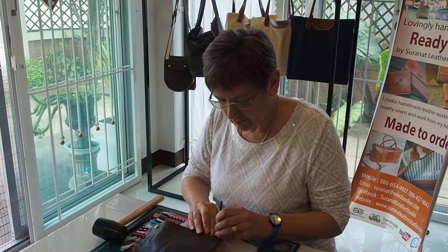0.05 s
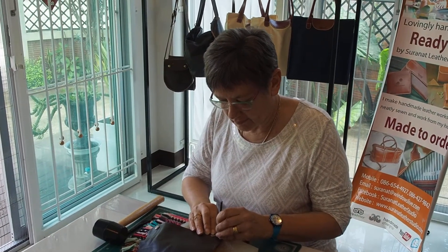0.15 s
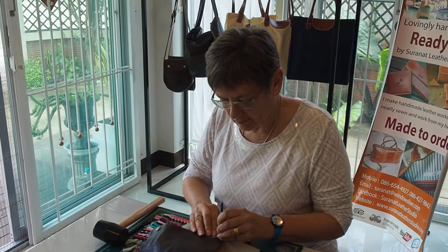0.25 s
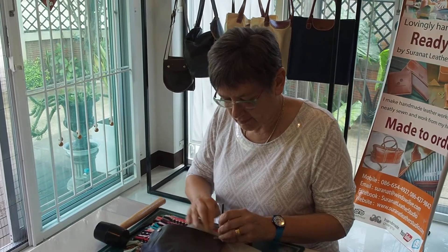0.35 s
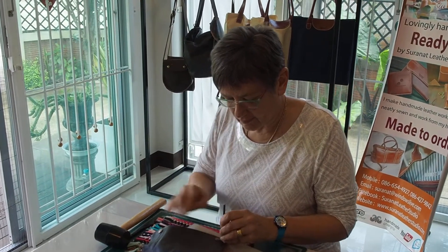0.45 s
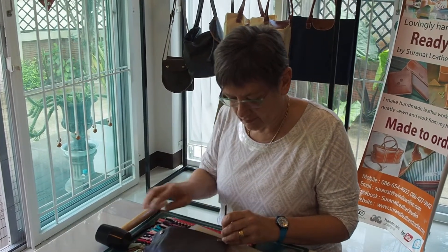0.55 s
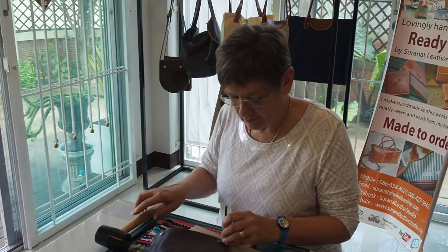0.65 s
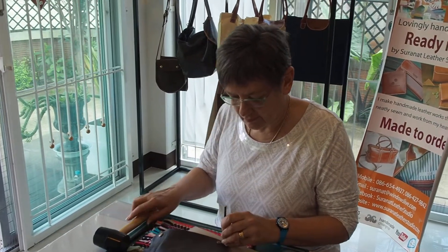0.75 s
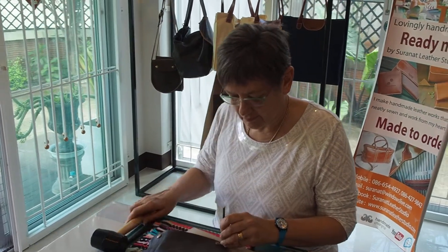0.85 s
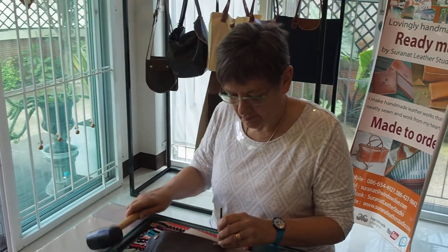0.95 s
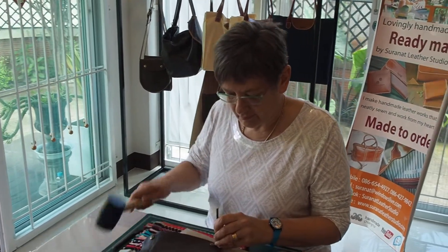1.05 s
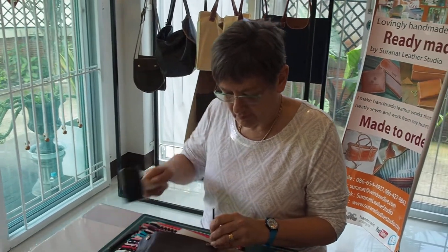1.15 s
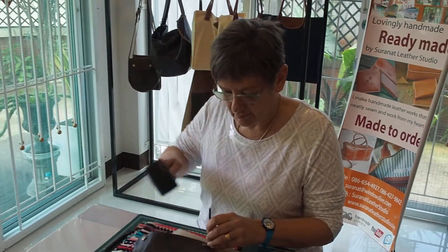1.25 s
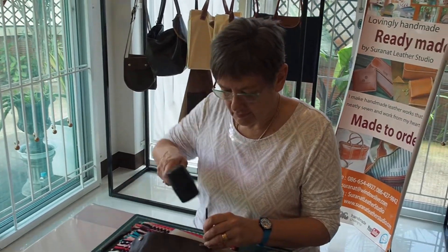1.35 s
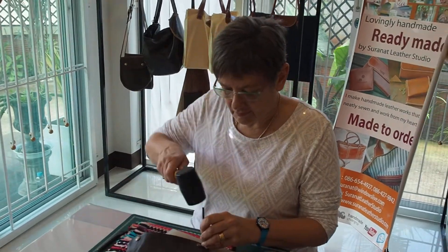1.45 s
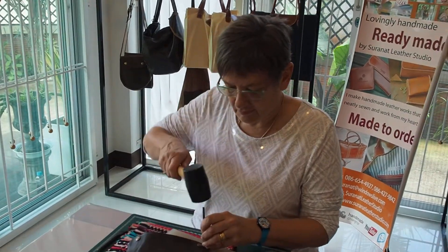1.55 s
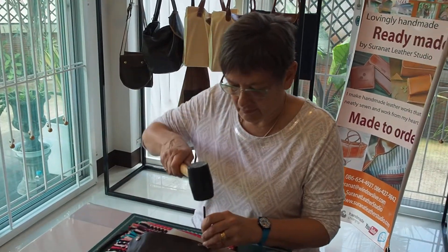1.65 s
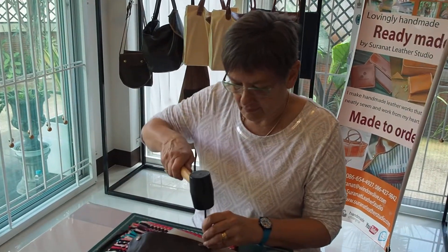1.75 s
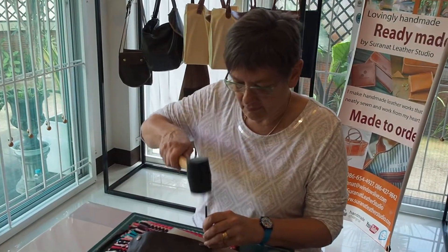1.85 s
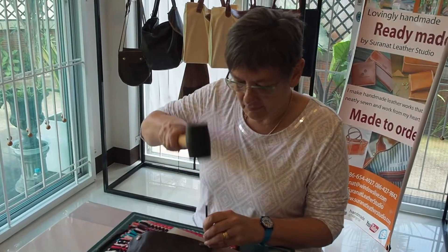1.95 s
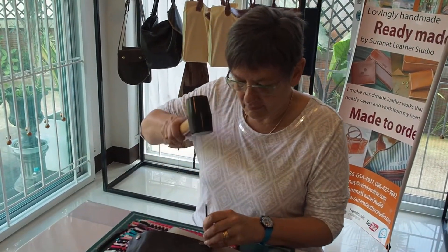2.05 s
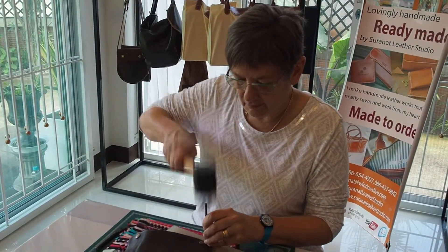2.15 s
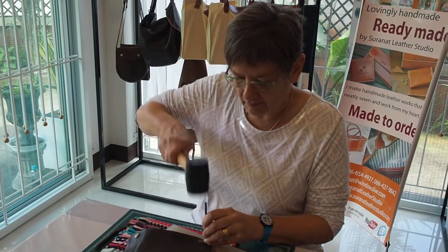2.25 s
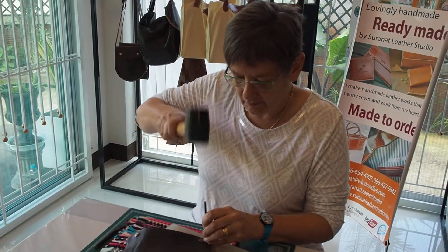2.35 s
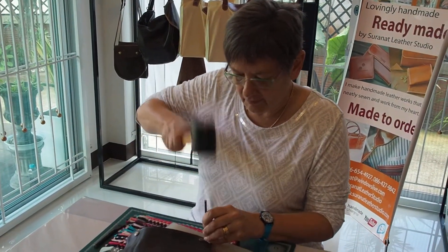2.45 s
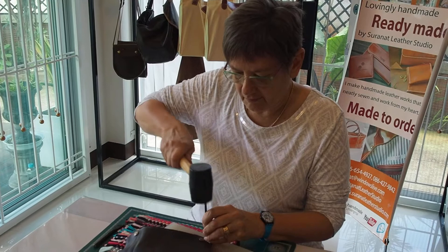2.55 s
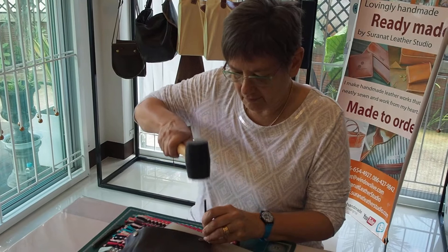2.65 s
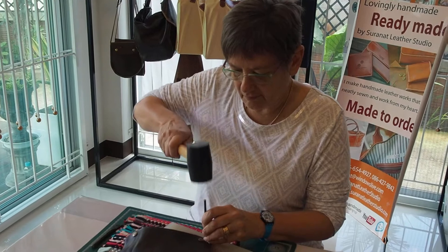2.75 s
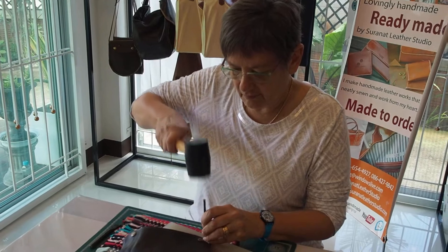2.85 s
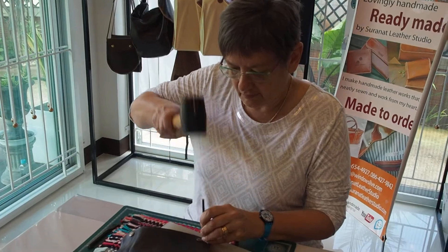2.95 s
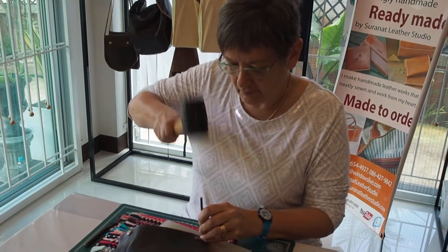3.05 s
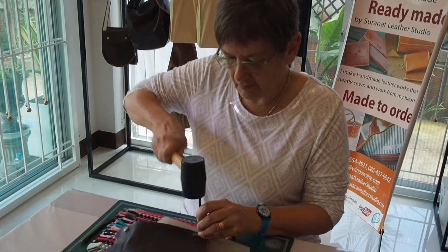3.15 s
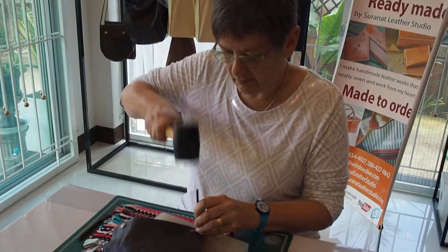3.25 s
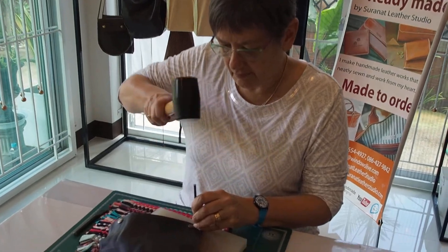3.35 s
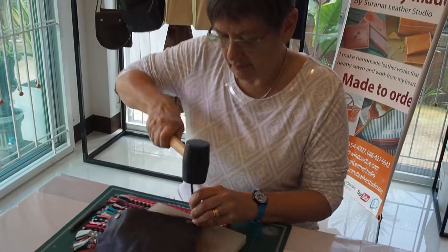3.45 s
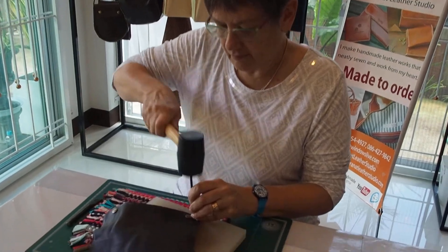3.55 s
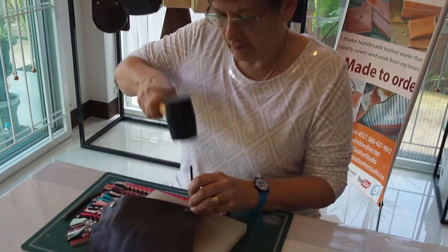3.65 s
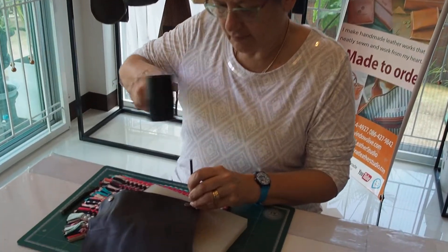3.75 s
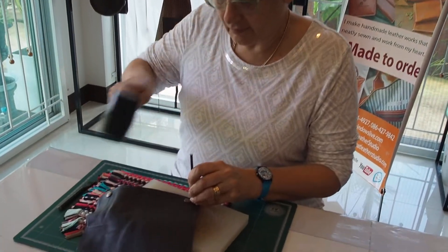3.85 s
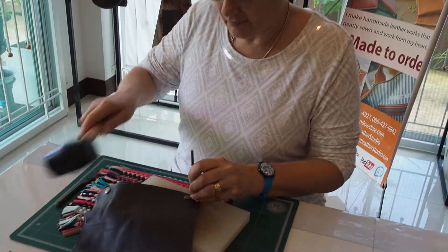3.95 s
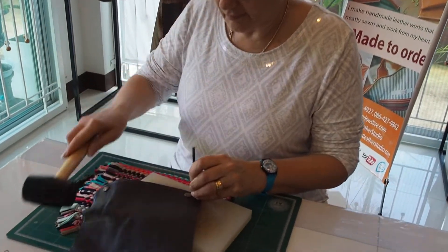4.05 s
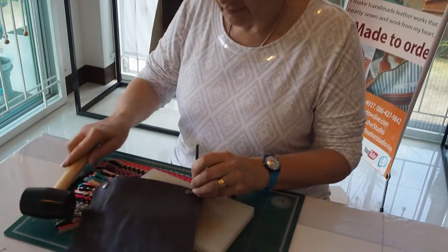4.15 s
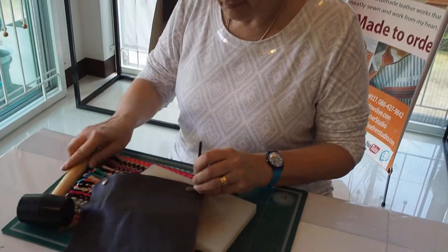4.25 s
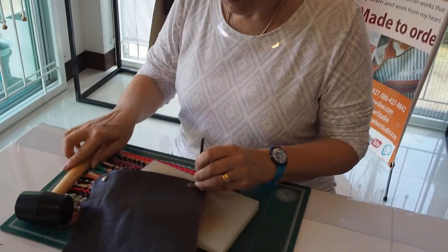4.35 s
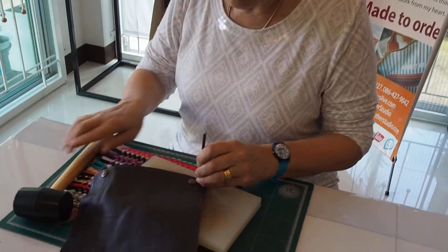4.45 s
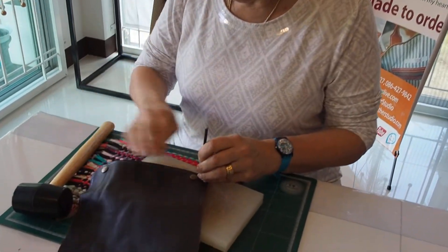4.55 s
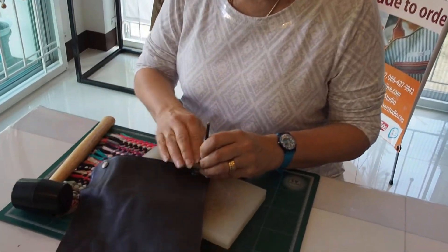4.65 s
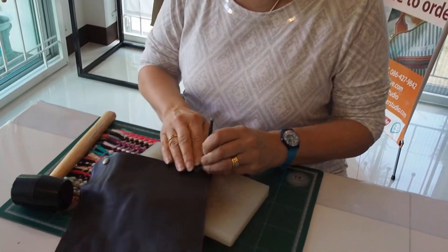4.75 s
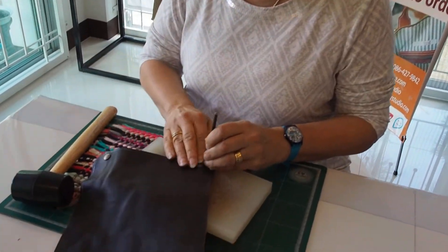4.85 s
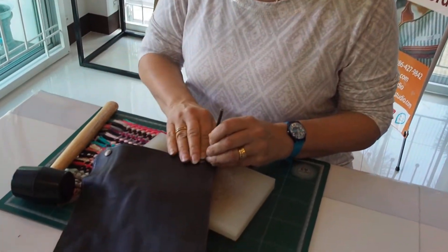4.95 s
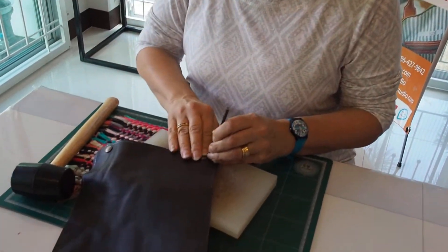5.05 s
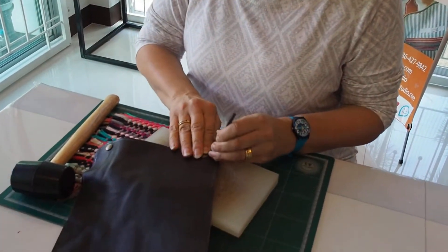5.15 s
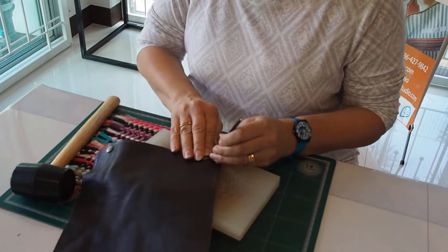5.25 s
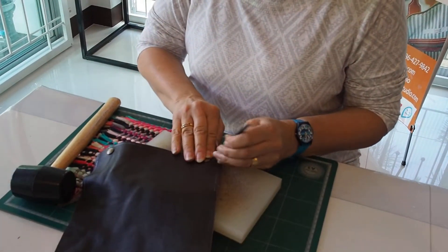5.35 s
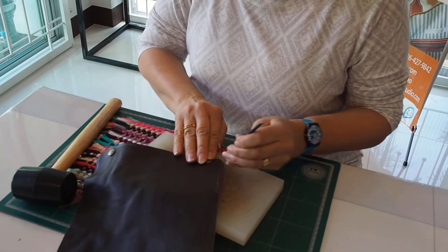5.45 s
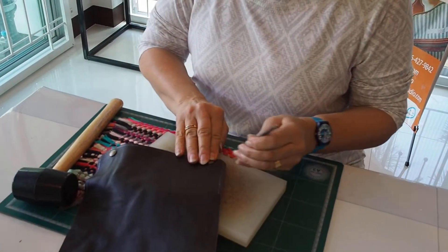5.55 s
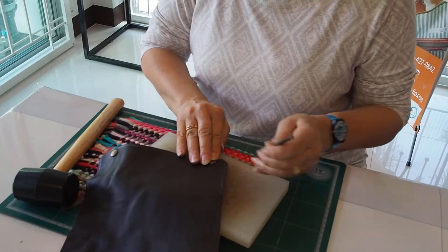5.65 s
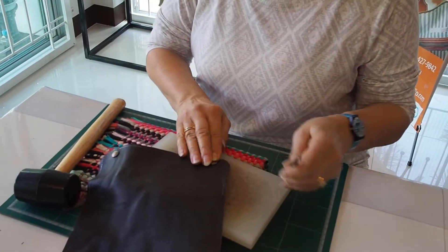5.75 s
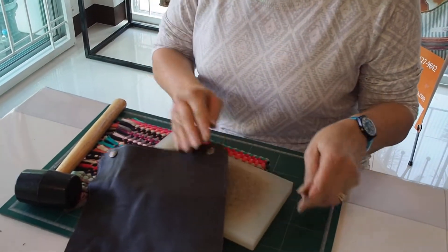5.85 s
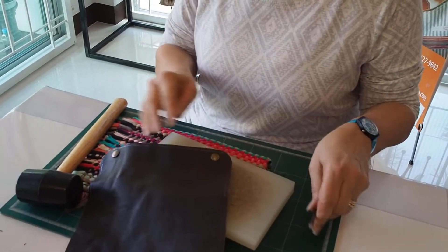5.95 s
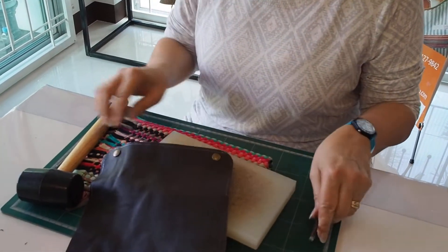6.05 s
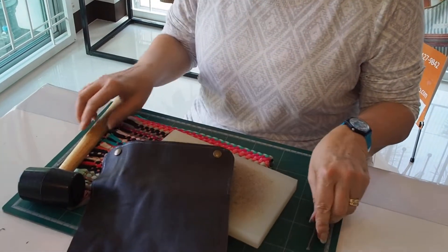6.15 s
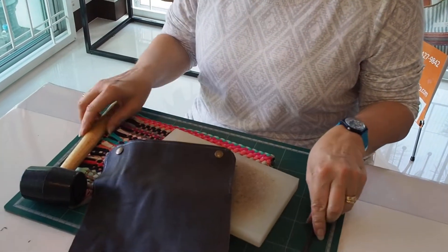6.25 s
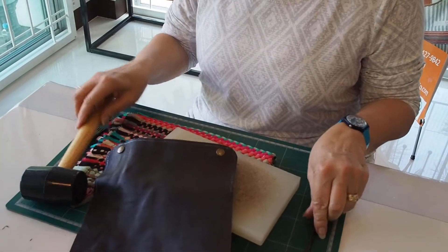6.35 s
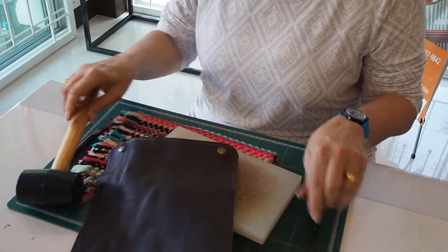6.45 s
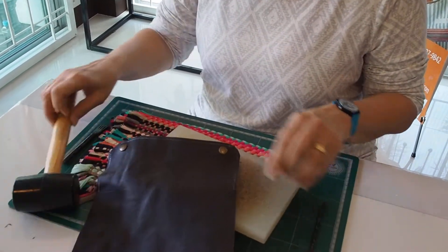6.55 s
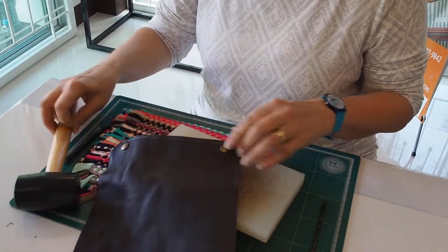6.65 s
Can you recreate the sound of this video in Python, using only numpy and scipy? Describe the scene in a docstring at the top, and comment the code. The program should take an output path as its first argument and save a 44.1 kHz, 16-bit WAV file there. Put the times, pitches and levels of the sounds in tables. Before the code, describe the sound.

Close, slightly overloaded microphone in a bright tiled workshop. A faint squeak and small thud as a mallet is lifted, one light tap, then four loud cracking blows of steel through leather into a board, the table booming under each. The mallet lands with a dull thud and wooden clack, followed by brushes, soft pats and handle knocks over a faint outdoor wash.

```python
"""A tiled workshop: a mallet drives a steel punch through leather into a cutting board on a table.
The mallet is picked up, taps once, strikes four times and is laid down; small handling sounds follow.
Struck bodies are sums of dying modes in a diffuse room; brushes, wash and rumble are shaped noise.
Outside, a vehicle passes and a motor hums. Loud blows overload the near microphone and its limiter ducks."""
import sys
import numpy as np
from scipy import signal
from scipy.fft import rfft, irfft, next_fast_len
from scipy.io import wavfile

SR = 44100
rng = np.random.default_rng(int(sys.argv[2]) if len(sys.argv) > 2 else 0)


def store_pcm(level_fs):
    """Save levels as 16-bit WAV."""
    pcm = np.round(np.clip(level_fs, -1, 1) * 32767).astype(np.int16)
    wavfile.write(sys.argv[1], SR, np.atleast_2d(pcm).T)


N = 295351
TIME = np.arange(N) / SR  # s, the whole scene
RING = np.arange(SR) / SR  # s, one struck sound

# modes of the table: f/Hz, level/dB, t60/s
TABLE_MODES = [(70.8, -28, 1.12), (110.3, -20, 0.42), (120.2, -10.5, 0.1), (132, -10.5, 0.58),
               (155.7, -28, 0.93), (182.5, -27, 0.85), (218, -24, 0.13), (308, -19.5, 0.19),
               (357.6, -15, 0.1), (509, -18, 0.087)]
# modes of the mallet head: f/Hz, level/dB, t60/s
HEAD_MODES = [(159, -10, 0.05), (337, -17.5, 0.14), (440, -4.5, 0.029), (540, 1.5, 0.0067), (825, 0, 0.029),
              (1017, 4, 0.0045)]


def amp(db):
    """Decibels to gain."""
    return 10 ** (np.asarray(db) / 20)


def unit(x):
    """Scales to rms 1."""
    return x / np.sqrt(np.mean(x ** 2) + 1e-20)


def read(points, hz):
    """Reads a curve on a log-frequency axis."""
    f, value = np.transpose(points)
    return np.interp(np.log(hz + 1), np.log(f + 1), value)


def add(mix, s, sound):
    """Mixes a two-channel sound in at time s."""
    part = mix[:, round(s * SR):][:, :sound.shape[1]]
    part += sound[:, :part.shape[1]]


def lowpass(x, hz, order=1):
    """Gentle causal low-pass."""
    return signal.sosfilt(signal.butter(order, min(hz, 0.45 * SR), fs=SR, output="sos"), x)


def pair(size, colour, lag=0):
    """Coloured diffuse noise at two close ports: nearly the same through most of the bass, unrelated in the treble."""
    # f/Hz, left-right likeness (1 = the same; 0 and below are used as unrelated)
    likeness = [(30, 0.082), (60, 0.82), (130, 0.97), (290, 0.93), (640, 0.95), (1410, 0.8), (3100, 0.14),
                (6820, -0.39), (15000, -0.75)]
    length = next_fast_len(size, real=True)
    hz = np.fft.rfftfreq(length, 1 / SR)
    mid, side = rfft(rng.standard_normal((2, length)))
    same = np.clip(read(likeness, hz), 0, 1)
    mid = mid * np.sqrt((1 + same) / 2)
    side = side * np.sqrt((1 - same) / 2)
    right = (mid - side) * np.exp(-2j * np.pi * hz * lag)  # lag in s
    ports = np.array([mid + side, right])
    return irfft(ports * amp(read(colour, hz)), length)[:, :size]


def ring(modes, contact_hz, late=0):
    """A struck body: dying modes of alternating sign; a softer contact excites less treble."""
    t = np.maximum(RING - late, 0)
    swing = np.zeros(len(RING))
    for k, (hz, db, t60) in enumerate(modes):
        swing += (-1) ** k * amp(db - 60 * t / t60) * np.cos(2 * np.pi * hz * t)
    return lowpass(swing * (RING >= late), contact_hz, order=2)


def push(hz):
    """A soft shove of the table top: about one swing, no ring."""
    cycles = RING * hz
    envelope = (cycles / 0.89) ** 2 * np.exp(2 - 2 * cycles / 0.66)
    return envelope * np.sin(2 * np.pi * cycles)


def scuff(length, low_hz, high_hz, snap, order=4):
    """A gritty burst from surfaces that slip as they meet; snap is the energy share of the first click."""
    grit = rng.standard_normal(len(RING)) * np.exp(-RING / length)
    share = np.clip(snap, 0, 1)
    energy = length * SR / 2
    burst = np.sqrt(1 - share) * grit + np.sqrt(share * energy) * (RING == 0)
    burst = lowpass(burst - lowpass(burst, low_hz), high_hz, order=order)
    return burst * np.sqrt(energy / np.sum(burst ** 2))


def in_room(sound, wet_db, build=0.0049):
    """Direct sound, first echoes and a diffuse tail that swells and dies faster in the treble."""
    # reverberation: f/Hz, t60/s
    room_t60 = [(100, 0.99), (300, 0.64), (800, 0.54), (2000, 0.52), (5000, 0.49), (14000, 0.4)]
    # colour of the tail against the direct sound: f/Hz, level/dB
    room_colour = [(100, -11.5), (300, 3.5), (750, 2.5), (1500, 3.5), (3600, 4), (6500, -4), (14000, 0)]
    # echoes off table, body and floor: t/s, level/dB
    echoes = [(.0056, -13), (.0098, -47), (0.0102, -15)]
    # port balance for direct sound from the table: f/Hz, left minus right/dB
    port_balance = [(1000, -0.5), (2000, 0), (4000, 8.5), (8000, 14.5), (12000, -29)]
    hz, t, z = signal.stft(pair(len(RING), room_colour), SR, nperseg=256)
    t60 = read(room_t60, hz)[:, None]
    z = z * amp(-60 * t / t60)
    z = z * np.sqrt(2 * np.log(1000) / (t60 * SR))  # equal energy whatever the decay time
    tail = signal.istft(z, SR)[1][:, :len(RING)]
    response = amp(wet_db) * tail * (1 - np.exp(-(RING / build) ** 2))
    for s, db in echoes:
        response[:, round(s * SR)] += amp(db)
    tilt_db = read(port_balance, np.fft.rfftfreq(2 * len(RING), 1 / SR)) / 2
    direct = irfft(rfft(sound, 2 * len(RING)) * amp([tilt_db, -tilt_db]))
    reflected = signal.fftconvolve(sound[None], response, axes=1)
    return direct[:, :len(RING)] + reflected[:, :len(RING)]


def background(swell_db=0.38):
    """Outdoor wash that swells very slightly, reaching the right port first, and the microphone's hiss."""
    # outdoor wash: f/Hz, relative level per Hz/dB
    wash_colour = [(25, -19), (58, -12), (92, -3), (175, -2), (250, -12), (340, -7.5), (620, -6.5),
                   (1050, -3.5), (1600, -9), (2600, -18.5), (4000, -21), (6300, -27.5), (10000, -31),
                   (16000, -42)]
    # microphone hiss: f/Hz, relative level per Hz/dB
    hiss_colour = [(2000, -30), (6000, -7), (7600, 8), (9000, -23), (12300, -2), (13300, 5.5), (16000, 4.5)]
    wash_db, hiss_db, wash_lag_s = -35, -51, -0.000064
    swell = unit(lowpass(rng.standard_normal(N), 5.9, order=2))
    wash = amp(wash_db + swell_db * swell) * unit(pair(N, wash_colour, wash_lag_s))
    return wash + amp(hiss_db) * unit(pair(N, hiss_colour))


def motor():
    """One hum of steady pitch that swells when the motor takes up load."""
    hum_hz, idle_db, load_db = 300, -51.5, -36.5
    load_at_s, rise_s = 3.68, 0.24
    load = 1 - np.exp(-np.maximum(TIME - load_at_s, 0) / rise_s)
    level = amp(idle_db) * (1 - load) + amp(load_db) * load
    return level * unit(np.sin(2 * np.pi * hum_hz * TIME))


def vehicle(waver=0.022):
    """A wavering engine note, lowered by Doppler shift as it passes, and a low roar emerge past buildings."""
    # road roar: f/Hz, relative level per Hz/dB
    roar_colour = [(40, -42), (65, -38), (85, 4.5), (115, -3.5), (145, 2.5), (200, -17), (260, -52),
                   (500, -45)]
    pass_at_s, speed_m_per_s, distance_m, sound_m_per_s = 5.55, 24, 22.3, 343
    # level at the closest point, and its change per doubling of distance
    engine_hz, engine_db, engine_fall_db = 81.6, -45.5, -0.5
    roar_db, roar_fall_db = -41.5, 0.5
    # when and how fast it clears the buildings that screen it; their loss
    clear_at_s, clear_s, screen_db = 2.7, 0.2, -14.5
    along = speed_m_per_s * (TIME - pass_at_s)
    metres = np.hypot(along, distance_m)
    doublings = np.log2(metres / distance_m)
    hz = engine_hz / (1 + speed_m_per_s / sound_m_per_s * along / metres)
    drift = unit(lowpass(rng.standard_normal(N), 6.0, order=2))
    turns = np.cumsum(hz * (1 + waver * drift)) / SR
    engine = amp(engine_db + engine_fall_db * doublings) * unit(np.sin(2 * np.pi * turns))
    roar = amp(roar_db + roar_fall_db * doublings) * unit(pair(N, roar_colour))
    screened = (1 - np.tanh((TIME - clear_at_s) / clear_s)) / 2
    return amp(screen_db * screened) * (engine + roar)


def handheld_rumble():
    """Faint low noise of the hand-held microphone, with a soft swell at each nudge."""
    # nudges: t/s, level/dB, half length/s
    nudges = [(5.8, -41, 0.066), (6.08, -37, 0.08), (6.329, -30.5, 0.12)]
    # rumble: f/Hz, relative level per Hz/dB
    rumble_colour = [(12, -8), (30, 16), (55, 4), (130, 9), (400, -39)]
    level = amp(-55)  # while held still
    for s, db, half in nudges:
        level = level + amp(db) * np.exp(-((TIME - s) / half) ** 2)
    return level * unit(pair(N, rumble_colour))


def squeak(jitter=0.058):
    """A brief unsteady high note: harmonics swell and fade in one arch and linger in the room."""
    # partials: multiple of the base pitch, level/dB
    partials = [(2, 1), (3, -8.5), (4, -12)]
    at_s, length_s, base_hz, level_db = 0.686, 0.043, 2390, -39.5
    out = np.zeros((2, N))
    arch = np.sqrt(np.maximum(np.sin(np.pi * np.minimum(RING / length_s, 1)), 0))
    wobble = unit(lowpass(rng.standard_normal(len(RING)), 440))
    turns = np.cumsum(base_hz * (1 + jitter * wobble)) / SR
    note = sum(amp(db) * np.sin(2 * np.pi * k * turns) for k, db in partials)
    add(out, at_s, in_room(amp(level_db) * arch * note, wet_db=1))
    return out


def brushing():
    """Fingers and punch brush the leather: decaying bursts of grainy noise, higher when longer."""
    # brushes: t/s, level/dB, decay length/s
    brushes = [(0.348, -53, 0.039), (0.825, -53, 0.023), (5.349, -45, 0.006), (5.373, -38, 0.0036),
               (5.835, -29.5, 0.0014), (6.631, -43, .0056)]
    centre_hz, rise = 8000, 0.26  # centre of a 10 ms brush; octaves per doubling of length
    out = np.zeros((2, N))
    for s, db, length in brushes:
        hz = centre_hz * (length / 0.01) ** rise
        grains = rng.standard_normal(len(RING)) * rng.exponential(1, len(RING))
        fizz = lowpass(grains - lowpass(grains, hz), hz, order=2)
        add(out, s, in_room(amp(db) * unit(fizz) * np.exp(-RING / length), wet_db=3.0))
    return out


def pats():
    """The free hand comes down softly on the table, shoving it without a ring."""
    # pats: t/s, level/dB, f/Hz
    hand_pats = [(6.0568, -13, 97.5), (6.185, -19, 110)]
    out = np.zeros((2, N))
    for s, db, hz in hand_pats:
        add(out, s, in_room(amp(db) * push(hz), wet_db=-2))
    return out


def mallet_handling():
    """The heavy head thuds on the mat; the light handle clacks and scuffs as it lands, and metal clinks."""
    # head bumping on the mat: t/s, head level/dB, table level/dB, contact hardness f/Hz
    bumps = [(0.952, -3, -18.5, 2270), (4.2870, 3, -4.5, 600)]
    # wooden handle on the table: t/s, wood level/dB, scuff level/dB, scuff brightness f/Hz
    clacks = [(4.3850, -7.5, -10, 5140), (4.3915, -23, -19, 6900), (6.2610, -2.5, -12.5, 4930),
              (6.3541, -20, -24.5, 5440), (6.391, -16.5, -25, 4500)]
    # something small and metal clinks as the handle settles: t/s, level/dB
    clinks = [(4.389, -26)]
    # modes of the handle: f/Hz, level/dB, t60/s
    handle_modes = [(386, -15, 0.016), (750, -11.5, 0.026), (935, -7.5, 0.013), (1580, -2, 0.0034),
                    (2470, -37, 0.0022), (3700, -4.5, 0.0028)]
    # modes of the small metal: f/Hz, level/dB, t60/s
    metal_modes = [(1450, 5, 0.031), (4640, 1, .014), (7500, -8, 0.017)]
    click_db = -18.5  # the click of first contact, against the head's thud
    out = np.zeros((2, N))
    for s, head_db, table_db, hard_hz in bumps:
        thud = amp(head_db) * ring(HEAD_MODES, hard_hz)
        thud += amp(table_db) * ring(TABLE_MODES, contact_hz=460, late=0.0011)
        click = amp(head_db + click_db) * scuff(length=0.00086, low_hz=4500, high_hz=6500, snap=0.95)
        add(out, s, in_room(thud, wet_db=-1.5) + in_room(click, wet_db=1.5))
    for s, wood_db, scuff_db, bright_hz in clacks:
        wood = amp(wood_db) * ring(handle_modes, contact_hz=6150)
        slip = amp(scuff_db) * scuff(length=0.00098, low_hz=1700, high_hz=bright_hz, snap=0.55, order=3)
        add(out, s, in_room(wood + slip, wet_db=2))
    for s, db in clinks:
        add(out, s, in_room(amp(db) * ring(metal_modes, contact_hz=12000), wet_db=0.5))
    return out


def punching(table_softness=0.25):
    """The steel cracks and shears the leather; a moment later it bottoms in the board and the table booms."""
    # mallet on the punch: t/s, force level/dB, contact hardness f/Hz
    blows = [(1.7667, -9.5, 1700), (2.2021, 10, 3400), (2.5322, 19.5, 2470), (3.152, 20.5, 2150),
             (3.4816, 19.5, 2260)]
    # modes of the cutting board: f/Hz, level/dB, t60/s
    board_modes = [(365, -12, 0.017), (553, -21.5, 0.024), (751, -1.5, 0.015), (881, 2, 0.0051),
                   (1074, -8.5, 0.018), (1490, -8, 0.0033), (1915, -6, 0.0027)]
    # modes of the steel punch: f/Hz, level/dB, t60/s
    punch_modes = [(2720, -22, 0.0045), (3540, -2.5, 0.0049), (4640, 3.5, 0.001), (6180, -2, 0.0025)]
    # levels at force 0 dB, and growth in dB per dB of force
    boom_db, boom_growth = 0.5, 0.61
    crack_db, crack_growth = -10, 1.015
    thump_db, thump_growth, thump_hz = -8, 0.25, 82
    # top edges of crack and shear as multiples of the hardness; shear level against the crack
    crack_bright, shear_bright, shear_db = 2.9, 3.1, -32.5
    recoil_db, recoil_hz = -1, 377  # the head's own dull ring, against the thump; its top edge
    out = np.zeros((2, N))
    for s, force_db, hard_hz in blows:
        steel_db = crack_db + crack_growth * force_db
        crack = amp(steel_db) * ring(punch_modes, crack_bright * hard_hz)
        add(out, s, in_room(crack, wet_db=-5))
        # the parting leather hisses briefly, mostly heard by way of the room
        hiss = scuff(length=0.0016, low_hz=1500, high_hz=shear_bright * hard_hz, snap=0.85, order=2)
        add(out, s, in_room(amp(steel_db + shear_db) * hiss, wet_db=20))
        knock = amp(force_db) * ring(board_modes, hard_hz, late=0.0003)
        add(out, s, in_room(knock, wet_db=1.0))
        # board and mat cushion the blow on its way to the table
        boom = ring(TABLE_MODES, table_softness * hard_hz, late=0.00097)
        add(out, s, in_room(amp(boom_db + boom_growth * force_db) * boom, wet_db=-7.5))
        # the mallet's weight pushes the table down while its head rings
        thump = amp(recoil_db) * ring(HEAD_MODES, recoil_hz) - push(thump_hz)
        add(out, s, in_room(amp(thump_db + thump_growth * force_db) * thump, wet_db=-3.5))
    return out


def scene():
    """Everything that reaches the two ports."""
    surroundings = background() + motor() + vehicle() + handheld_rumble()
    handling = squeak() + brushing() + pats() + mallet_handling()
    return surroundings + handling + punching()


def record(dry, ceiling_db=-4.5, recovery_db_per_s=42, sense=0.00077, attack=0.00012):
    """Bass cut; a limiter ducks just too late and recovers slowly, so loud fronts clip; band limit."""
    sound = signal.sosfilt(signal.butter(2, 45, "high", fs=SR, output="sos"), dry)
    sound = sound * amp([[0.4], [-0.4]])  # left port slightly hotter
    power = lowpass((sound ** 2).mean(0), 1 / (2 * np.pi * sense))  # sense and attack in s
    level_db = 10 * np.log10(abs(power) + 1e-12)
    # hold each peak and let it fall at a constant rate in dB
    fall = recovery_db_per_s * TIME
    held_db = np.maximum.accumulate(level_db + fall) - fall
    over_db = np.maximum(held_db - ceiling_db, 0)
    ducked = sound / amp(lowpass(over_db, 1 / (2 * np.pi * attack)))
    edge = signal.firwin(255, 16000, window=("kaiser", 8), fs=SR)
    return signal.oaconvolve(np.clip(ducked, -1, 1), edge[None], "same")


dry = scene()
out = record(dry)
store_pcm(out)
```